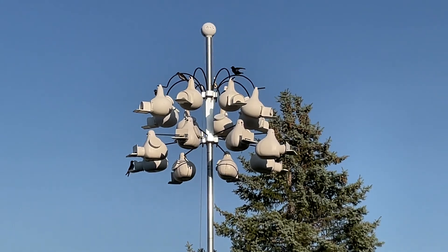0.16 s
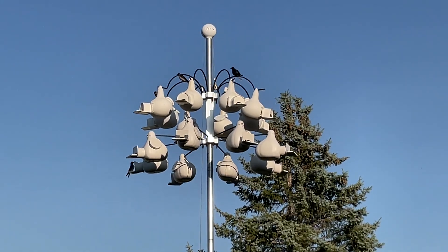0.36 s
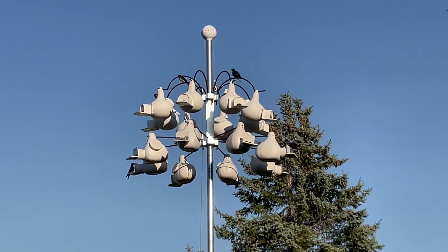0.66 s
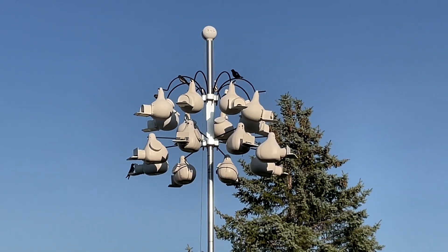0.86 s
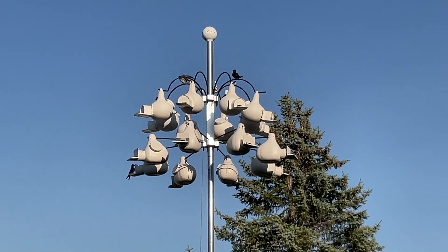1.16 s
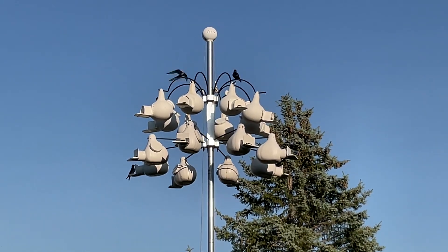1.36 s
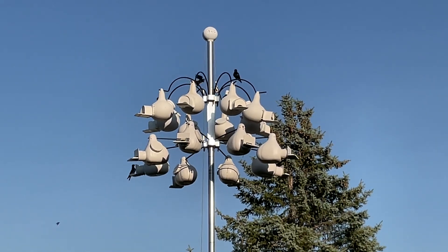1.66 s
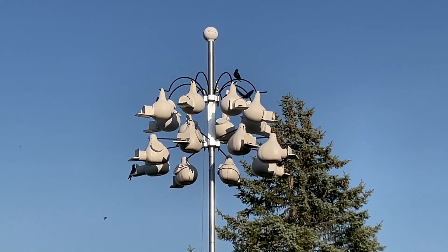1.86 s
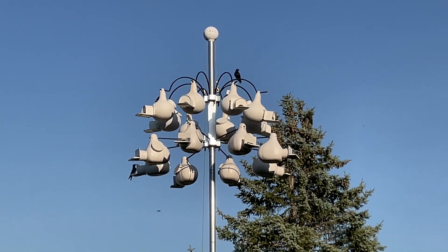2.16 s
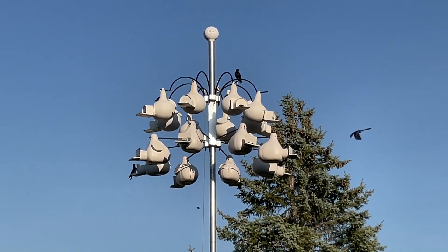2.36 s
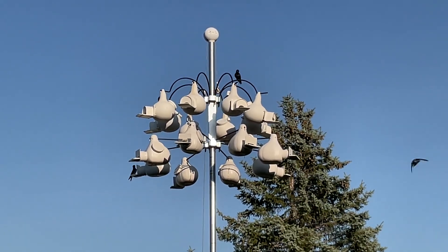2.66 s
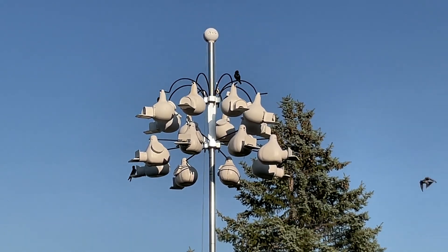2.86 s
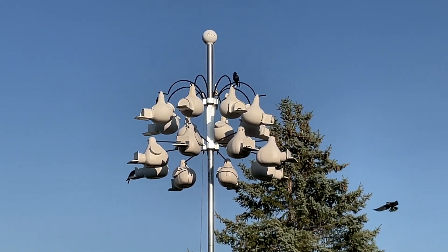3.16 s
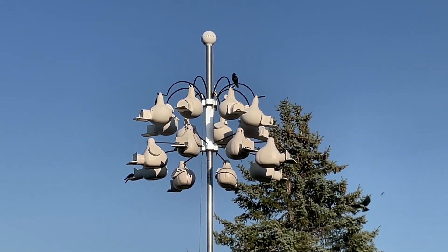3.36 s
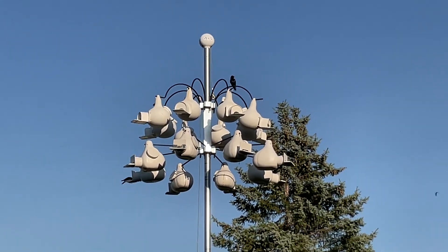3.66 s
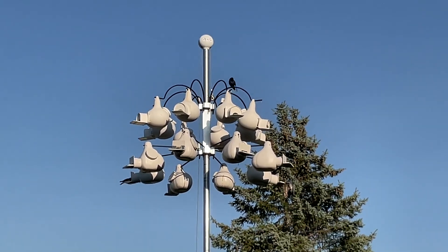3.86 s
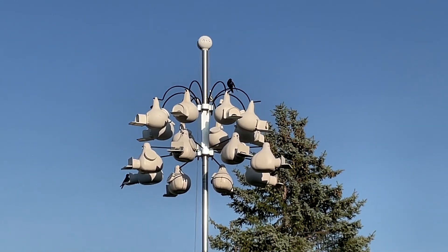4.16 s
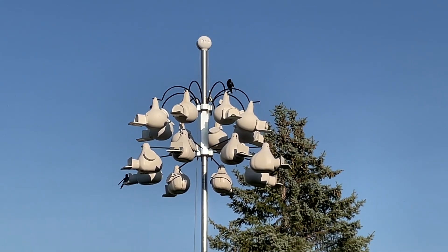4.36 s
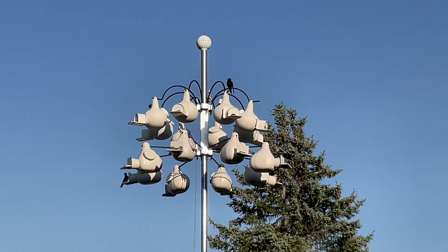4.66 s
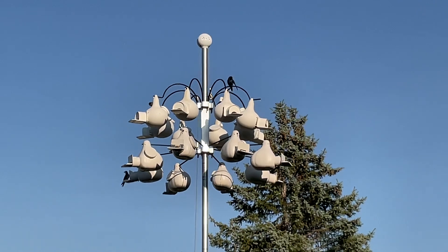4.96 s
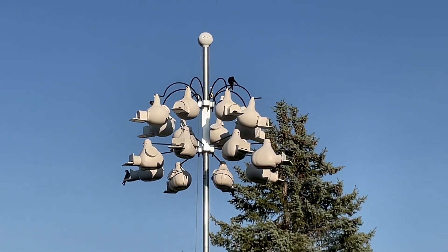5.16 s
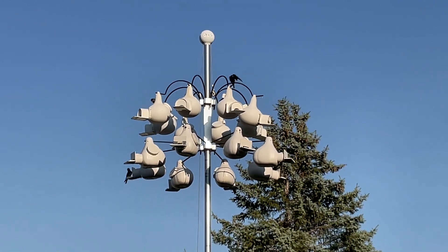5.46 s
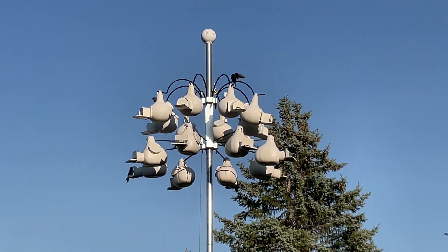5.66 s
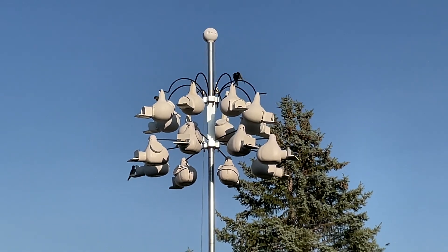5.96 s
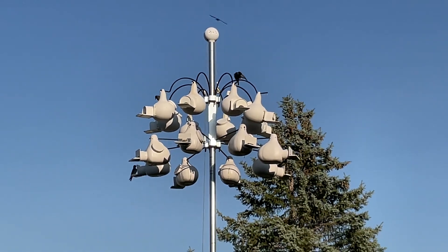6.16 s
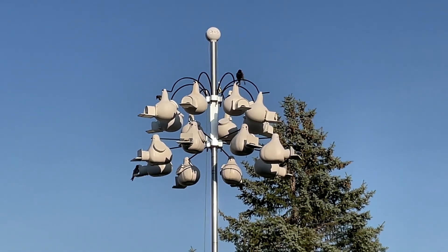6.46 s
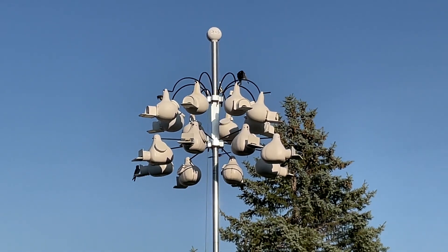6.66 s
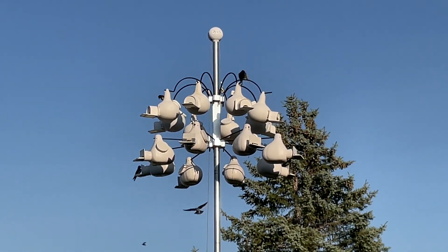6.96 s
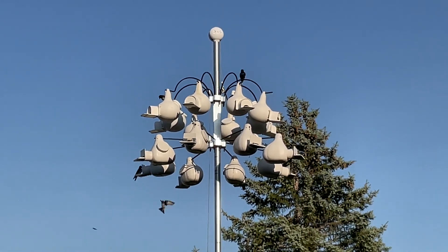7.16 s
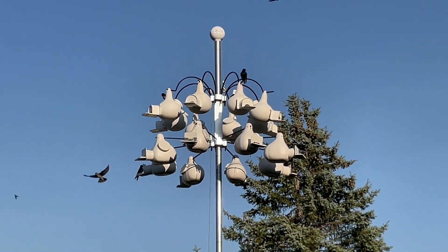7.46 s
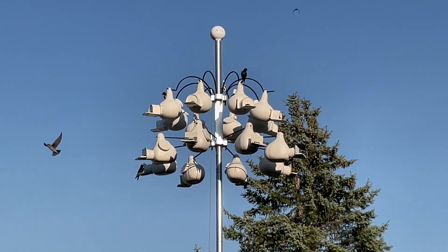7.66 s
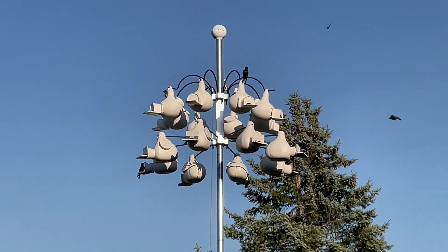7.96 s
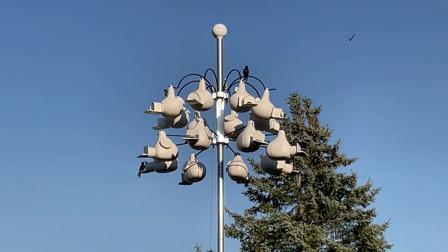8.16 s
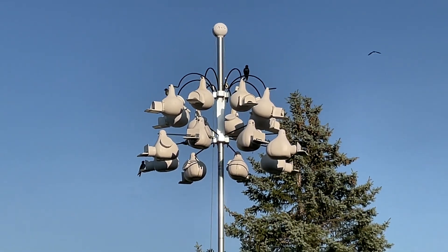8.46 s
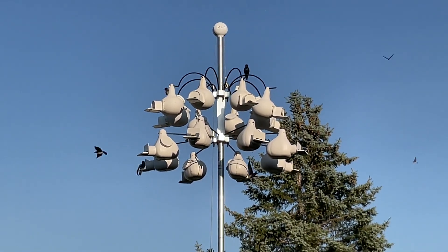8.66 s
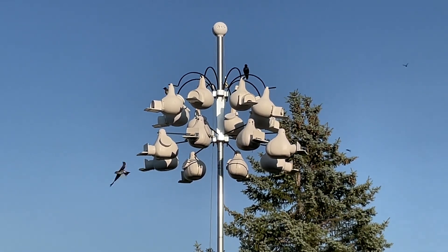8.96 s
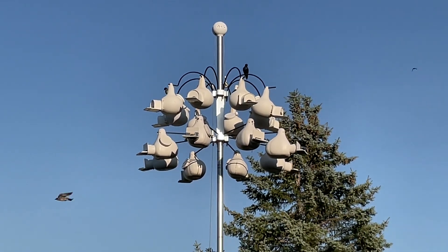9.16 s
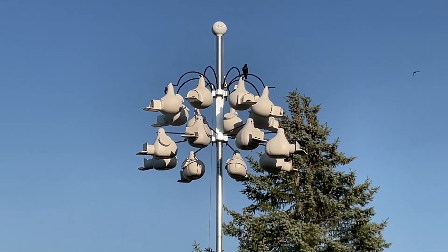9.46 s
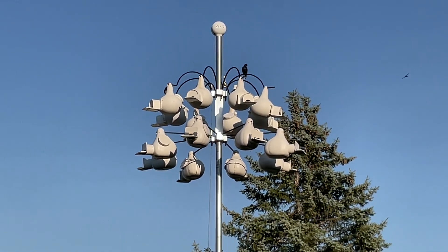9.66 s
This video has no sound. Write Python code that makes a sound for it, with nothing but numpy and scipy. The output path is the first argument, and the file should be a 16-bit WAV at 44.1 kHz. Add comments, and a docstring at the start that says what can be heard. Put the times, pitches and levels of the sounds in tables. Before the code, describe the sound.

Birds call around a rack of nesting gourds in a backyard. Short downward whistles and rough rasps come in scattered bursts, with a quick run of chirps early, a sparser middle, and a busier stretch of chirps and buzzes near the end. Farther birds twitter faintly, and a few light taps sound. Distant traffic and engines rumble low throughout, heard in stereo with a faint outdoor echo.

```python
"""In a back yard, purple martins call around a rack of nesting gourds. Each bird's voice box makes a
nearly pure tone: it slides down for 'chew' calls and wavers fast for buzzes, and two tones make a rasp.
More of the colony chatters farther off, engines drone over distant traffic, and a few light taps sound.
The yard gives a faint echo. Two small microphone openings hear it all, out of step around 3 kHz."""
import sys
import numpy as np
from scipy import signal
from scipy.fft import rfft, irfft, next_fast_len
from scipy.io import wavfile
from scipy.ndimage import map_coordinates

SR = 44100
rng = np.random.default_rng(int(sys.argv[2]) if len(sys.argv) > 2 else 0)


def persist_wave(psi):
    """Save psi, clipped to +-1, as 16-bit WAV."""
    counts = np.round(np.clip(psi, -1, 1) * 32767).astype(np.int16)
    wavfile.write(sys.argv[1], SR, np.atleast_2d(counts).T)


N = 432176

FLICK_S = .014, .028  # shortest and longest note of a distant bird


def amp(db):
    """Turn decibels into a number to multiply by."""
    return 10 ** (np.asarray(db) / 20)


def unit(x):
    """Scale a signal to an average strength (rms) of 1."""
    return x / np.sqrt(np.mean(x ** 2) + 1e-20)


def along(points, hz):
    """Read between (frequency, value) points, with octaves evenly spaced."""
    freqs, values = np.transpose(points)
    return np.interp(np.log(hz + 1), np.log(freqs + 1), values)


def curves(rows):
    """Give one value per sample for each column after the time."""
    times, *columns = np.transpose(rows)
    return [np.interp(np.arange(N) / SR, times, column) for column in columns]


def wobble(rate, size):
    """A smooth curve through rate random points a second."""
    knots = rng.standard_normal(int(size * rate / SR) + 4)
    grid = np.arange(10 * len(knots)) / 10
    smooth = map_coordinates(knots, [grid], mode="nearest")
    return np.interp(np.arange(size) * rate / SR, grid, smooth)


def filtered(x, response):
    """Change the strength and timing of each frequency in x by response(hz)."""
    size = next_fast_len(N + SR // 2)
    return irfft(rfft(x, size) * response(np.fft.rfftfreq(size, 1 / SR)), size)[..., :N]


def add(track, s, sound):
    """Mix a sound into a track at s seconds."""
    part = track[max(round(s * SR), 0):][:len(sound)]
    part += sound[:len(part)]


def spread(pair):
    """Turn two unrelated signals into sound that comes from all around."""
    # how alike left and right are: (frequency [Hz], likeness [0 to 1])
    likeness = [(100, .99), (250, 0.7), (500, 0.58), (1200, 0.25), (2500, 0.92), (4000, 0.88), (9000, 0.9)]
    turn = lambda hz: np.arccos(np.clip(along(likeness, hz), -1, 1)) / 2
    mid, side = filtered(pair, lambda hz: np.array([np.cos(turn(hz)), np.sin(turn(hz))]))
    return np.array([mid + side, mid - side])


def rush(spectrum):
    """Noise from all around, with the given tone colour and a strength of 1."""
    noise = rng.standard_normal((2, N))
    return unit(spread(filtered(noise, lambda hz: amp(along(spectrum, hz)))))


def drone(hz, level_db, overtones, sway_db=2.0):
    """One wavering engine tone; overtones maps multiples of its pitch to dB."""
    phase = 2 * np.pi * np.cumsum(hz + 0.724 * wobble(5, N)) / SR
    tone = np.sin(phase) + sum(amp(db) * np.sin(k * phase) for k, db in overtones.items())
    return np.sqrt(2) * amp(level_db + sway_db * wobble(3.7, N)) * tone


def background(engine_gain_db=-1.06, traffic_db=-52.5, traffic_sway_db=2.4, air_db=-63):
    """Far engines hum over traffic rumble and soft outdoor air."""
    # steady engine tones: (pitch [Hz], relative level [dB])
    hums = [(55.5, -58.5), (61.2, -53.5), (93, -67.5)]
    # three engine tones that swell and drift: (time [s], pitch [Hz], relative level [dB])
    low_tone = [(0, 77.14, -51.5), (3.5, 78.2, -48.5), (5.5, 77.98, -52.5), (7.3, 77.24, -44.5),
                (7.8, 77.76, -51), (8.5, 78.4, -49.5), (9.2, 79.4, -48), (9.8, 83.4, -46)]
    middle_tone = [(0, 101.6, -48), (2.2, 101.7, -51), (3.7, 100.9, -71.5), (5.2, 100.3, -52),
                   (7.3, 101.1, -46), (8.6, 102, -49), (9.8, 102.2, -55)]
    high_tone = [(0, 122.1, -55.5), (2.1, 121.9, -53), (3, 120.3, -63.5), (4, 121.8, -50.5),
                 (5, 124.0, -62.5), (6.4, 124.1, -55), (7.5, 123.5, -54.5), (8.9, 119.8, -48.5),
                 (9.8, 122.3, -56.5)]
    # tone colour of the traffic and the air: (frequency [Hz], relative level [dB])
    traffic_colour = [(25, -30), (40, -11), (55, -2.5), (90, 1.5), (130, -5), (180, -13.5), (250, -20.5),
                      (400, -44), (800, -69.5)]
    air_colour = [(100, -6.5), (300, 1), (550, 1), (800, 2.5), (1200, -2.5), (1800, -6), (2600, -7.5),
                  (3600, -11), (4500, -19), (6000, -26), (8500, -36.5), (13000, -42.5)]
    engines = (sum(drone(hz, db, overtones={3: -18}) for hz, db in hums)
               + drone(*curves(low_tone), overtones={2: -15})
               + drone(*curves(middle_tone), overtones={3: -29})
               + drone(*curves(high_tone), overtones={2: -24}))
    traffic = amp(traffic_db + traffic_sway_db * wobble(6, N)) * rush(traffic_colour)
    air = amp(air_db) * rush(air_colour)
    return amp(engine_gain_db) * engines + traffic + air


def progress(length, edge):
    """How far a note has got at each sample (0 to 1), with extra room for its soft ends."""
    return np.arange(-edge / 2, length + edge / 2, 1 / SR) / length


def swell(u, length, levels_db, attack, release):
    """Loudness along a note (u from 0 to 1): evenly spaced levels between a soft start and end."""
    ends = np.clip(np.minimum(u / attack, (1 - u) / release) * length + .5, 0, 1)
    marks = np.linspace(1 / 6, 5 / 6, len(levels_db))
    return amp(np.interp(u, marks, levels_db)) * np.sin(np.pi / 2 * ends) ** 2


def voice_box(hz, bright_db, step_db, jitter, hoarse, count, flicker_db=6.0):
    """A nearly pure tone with count hoarse overtones, strongest where the bird's throat rings."""
    # how much of an overtone the throat lets out: (frequency [Hz], relative level [dB])
    throat = [(3300, -8), (4100, -13.5), (4900, -22.5), (6000, -24), (7000, -26.5), (8200, -30),
              (9500, -39.5), (11000, -34), (13000, -35)]
    hz = hz * (1 + jitter * wobble(900, len(hz)))
    phase = 2 * np.pi * np.cumsum(hz) / SR
    tone = np.sin(phase)
    for k in range(2, 2 + count):
        treble_share = np.clip(k * hz / 1500 - 2.3, 0, 1)
        db = along(throat, k * hz) + step_db * (k - 2) + bright_db * treble_share
        gain = amp(db + flicker_db * wobble(220, len(hz))) * (k * hz < SR / 2)
        tone = tone + gain * np.sin(k * phase + hoarse * k * wobble(1100, len(hz)))
    return np.sqrt(2) * tone


def chirp(length, start_hz, end_hz, bend, levels_db, bright_db, attack=.012, flutter_db=2):
    """One whistle sliding down; with a positive bend it falls fast and then levels off."""
    u = progress(length, attack)
    fall = np.hypot(u, 0.00289 / length * np.clip(1 - u, 0, 1))  # rounds off the top of the slide
    hz = start_hz * (end_hz / start_hz) ** (fall + bend * fall * (1 - fall))
    hz *= 1 + .01 * wobble(152, len(u))
    flutter = amp(flutter_db * wobble(221.6, len(u)))
    step_db = min(-6.0 + 0.29 * (max(levels_db) + 45.5), -3)  # softer notes lose their high overtones
    voice = voice_box(hz, bright_db, step_db, jitter=0.01, hoarse=.15, count=3)
    return swell(u, length, levels_db, attack, release=.004) * flutter * voice


def twitter(softest_db, low_hz, high_hz, fall, count):
    """The farthest birds scatter faint, ragged, falling notes at random."""
    out = np.zeros(N)
    for k, (when, pitch, size, loud, steep) in enumerate(rng.random((count, 5))):
        hz = low_hz + pitch * (high_hz - low_hz)
        length = np.interp(size, [0, 1], FLICK_S)
        note = chirp(length, hz, hz * fall ** (1 + steep), bend=.17,
                     levels_db=[softest_db + 7 * loud] * 3, bright_db=-3.5)
        roughness = unit(amp(1.2 * wobble(500, len(note))))
        add(out, (k + 2 * when) / count * N / SR, note * roughness)
    return out


def warble(length, peak_hz, scoop, sag, rate, depth, levels_db, bright_db, pulse_db=4.5, attack=0.0195):
    """Pitch wavers rate times a second around an arch; scoop and sag are its ends as shares of the peak."""
    u = progress(length, attack)
    top = .28  # the arch peaks this far into the note
    rising = scoop ** ((1 - u / top) ** 2)
    falling = sag ** (np.abs((u - top) / (1 - top)) ** 1.4)
    arch = peak_hz * np.where(u < top, rising, falling)
    cycle = 2 * np.pi * np.cumsum(rate * (1 + .09 * wobble(98.3, len(u)))) / SR
    swing = np.sin(cycle) + 0.33 * np.sin(2 * cycle)
    hz = arch * (1 + depth * amp(1.5 * wobble(130, len(u))) * swing)
    pulse = unit(amp(-pulse_db * np.cos(cycle) + 1.1 * wobble(250, len(u))))  # louder on each downswing
    voice = voice_box(hz, bright_db, step_db=0.0, jitter=0.017, hoarse=.12, count=2)
    return swell(u, length, levels_db, attack, release=0.013) * pulse * voice


def rasps(lag_s=0.023, warbles_per_s=138):
    """Both sides of the voice box sing: the upper voice leads and fades as the lower one swells."""
    # two-voiced rasps: (time [s], length [s], upper pitch [Hz], lower pitch [Hz],
    # upper level [dB], lower level [dB], brightness [dB])
    calls = [(0.143, 0.085, 4120, 2890, -48, -38, -0.5), (1.066, 0.097, 3370, 2506, -64.5, -50.5, -2.5),
             (1.952, 0.13, 4040, 2730, -60.5, -57, 3.5), (3.093, 0.1, 4186, 2820, -53, -48, 0),
             (4.962, .11, 4140, 2690, -58, -54, 1), (6.429, 0.1, 3980, 2680, -61, -54, -4.5),
             (9.108, 0.084, 3430, 2447, -49.5, -45, -5.5)]
    out = np.zeros(N)
    for s, length, upper_hz, lower_hz, upper_db, lower_db, bright_db in calls:
        upper = warble(length, upper_hz, scoop=.99, sag=.9, rate=warbles_per_s, depth=0.08,
                       levels_db=[upper_db - 2, upper_db, upper_db - 7], bright_db=bright_db + 5.5)
        lower = warble(length - lag_s, lower_hz, scoop=.99, sag=.91, rate=warbles_per_s, depth=0.11,
                       levels_db=[lower_db - 7, lower_db, lower_db - 4], bright_db=bright_db - 6)
        add(out, s - .01, upper)
        add(out, s + lag_s - .01, lower)
    return filtered(out, lambda hz: amp(along([(8400, 3), (10500, -8)], hz)))


def chews(gain_db=-0.7, end_hz=1648):
    """Each 'chew' starts high, usually fades as it falls, and ends on a flatter closing note."""
    # 'chew' calls: (time [s], length [s], start pitch [Hz], bend [no unit], early level [dB],
    # late level [dB], gap before closing note [s], closing level [dB], brightness [dB])
    calls = [(0.147, 0.034, 4300, .15, -41, -43, 0.023, -42, 8.5),
             (0.93, 0.06, 3580, 0.24, -51.5, -50, -0.014, -61, 1.5),
             (2.03, 0.072, 4460, 0.53, -34.5, -50.5, -0.012, -49.5, 1),
             (2.215, 0.054, 4410, 0.12, -41, -53.5, -.002, -53, -3),
             (2.398, 0.048, 4110, -0.19, -36.5, -54, -0.0049, -53, -10),
             (2.641, 0.041, 4450, 0.38, -39, -55.5, 0.0065, -51.5, 0),
             (2.767, 0.047, 4590, 0.03, -36.5, -46, 0.0068, -45, -3.5),
             (4.574, 0.05, 4640, .17, -46, -52.5, 0.0065, -46, -3),
             (4.893, 0.087, 3770, 0.86, -50.5, -61, -0.013, -63, -4),
             (6.962, .064, 4230, 0.68, -54.5, -55, -0.019, -56.5, 2.5),
             (7.199, .09, 4160, 0.88, -51.5, -56.5, .004, -54, -2),
             (7.327, 0.071, 4620, 0.64, -37.5, -52.5, -0.0043, -46.5, 6),
             (7.405, 0.045, 4590, -0.3, -48, -51, 0.0078, -48.5, 0),
             (8.058, 0.072, 4630, .68, -39.5, -52, -0.0058, -47, -3)]
    out = np.zeros(N)
    for s, length, start_hz, bend, early_db, late_db, gap, close_db, bright_db in calls:
        slide = chirp(length, start_hz, end_hz, bend, [early_db, late_db], bright_db)
        close = chirp(.034, 2600, 2180, bend=0.61, levels_db=[close_db + 3, close_db - 3], bright_db=-5)
        add(out, s - .0035, slide)
        add(out, s + length + gap - .0035, close)
    return amp(gain_db) * out


def triplets(slide_s=.05, gap_s=.002):
    """A steep opening note runs into a slide that dips in loudness; a short note closes the call."""
    # three-note calls: (time [s], opening length [s], slide start pitch [Hz], level [dB])
    calls = [(.785, 0.02, 3800, -39.5), (7.746, 0.02, 3610, -40), (8.486, .020, 3914, -40)]
    out = np.zeros(N)
    for s, opening_s, start_hz, db in calls:
        opening = chirp(opening_s, 3470, 2125, bend=-0.67, levels_db=[db, db + 0.5], bright_db=-4.5)
        slide = chirp(slide_s, start_hz, 1827, bend=.08, levels_db=[db, db - 7, db - 5], bright_db=-2)
        close = chirp(0.023, 2840, 2370, bend=0.48, levels_db=[db - 4, db - 5.5], bright_db=-12)
        for delay, note in [(0, opening), (opening_s, slide), (opening_s + slide_s + gap_s, close)]:
            add(out, s + delay - .0035, note)
    return out


def falling_notes(bend=0.28, fade_db=3):
    """Short falling notes sound alone, in quick clusters, or as part of a buzz, rasp or chew."""
    # notes: (time [s], length [s], start pitch [Hz], end pitch [Hz], level [dB], brightness [dB])
    notes = [(0.993, 0.032, 2470, 1540, -56, -27), (1.667, 0.039, 3000, 1850, -54.5, 5.5),
             (1.68, 0.059, 4600, 2120, -59.5, -4), (1.709, 0.045, 2090, 1644, -55, 9),
             (1.742, 0.047, 2070, 1690, -57.5, 1), (3.799, .031, 3160, 1880, -61, 10.5),
             (4.081, 0.04, 3330, 1750, -50, 1.5), (4.102, 0.042, 3670, 1690, -54.5, 8),
             (7.161, 0.015, 2730, 2040, -53.5, 2), (7.174, .042, 3160, 1960, -49, -9),
             (7.516, 0.05, 3000, 2125, -60.5, 11), (8.376, 0.014, 3030, 1930, -46, 0),
             (8.407, .03, 2870, 1978, -50.5, -4), (8.442, 0.02, 3120, 2620, -34.5, -25),
             (9.114, 0.0094, 4030, 3780, -39, -8)]
    out = np.zeros(N)
    for s, length, start_hz, end_hz, db, bright_db in notes:
        add(out, s - .0035, chirp(length, start_hz, end_hz, bend, [db, db - fade_db], bright_db))
    return out


def knocks():
    """Light taps, each a short ring and a crack of noise."""
    # taps: (time [s], level [dB], ring pitch [Hz], time to fade 60 dB [s], crack against ring [dB])
    taps = [(1.127, -47, 263, 0.035, -24), (2.145, -42, 740, .04, -32), (2.971, -39, 660, 0.033, -39),
            (8.769, -61, 5470, 0.011, 11.5), (8.873, -57.5, 6660, 0.014, -1)]
    out, t = np.zeros(N), np.arange(SR // 8) / SR
    for s, db, hz, fade_s, crack_db in taps:
        ring = np.sin(2 * np.pi * hz * t) * amp(-60 * t / fade_s) * (1 - np.exp(-t / 0.00089))
        crack = amp(crack_db - 60 * t / 0.0094) * rng.standard_normal(len(t))
        add(out, s, amp(db) * (ring + crack))
    return filtered(out, lambda hz: 1 / (1 + (hz / 9500) ** 4))


def far_chips(fall=.8, rough_db=3):
    """Birds farther off give short, ragged, falling chips."""
    # distant chips: (time [s], middle pitch [Hz], level [dB])
    chips = [(1.32, 3580, -63), (1.53, 5840, -72), (2.509, 6030, -71), (3.22, 3460, -62),
             (3.39, 3810, -60.5), (5.54, 5730, -72), (5.79, 3800, -65.5), (6.54, 3787, -61.5),
             (6.74, 5220, -70), (6.83, 3800, -63), (7.93, 3700, -56.5), (8.83, 6000, -68.5),
             (9.42, 3580, -61)]
    out = np.zeros(N)
    for (s, hz, db), size in zip(chips, rng.random(len(chips))):
        length = np.interp(size, [0, 1], FLICK_S)
        note = chirp(length, hz / np.sqrt(fall), hz * np.sqrt(fall), 0, [db] * 3, bright_db=1.5)
        roughness = unit(amp(rough_db * wobble(500, len(note))))
        add(out, s - .014, note * roughness)
    return out


def buzzes(rise_db=5, edge_db=5, scoop=0.89):
    """A single warbling voice swells and dies away, with a bright edge near 10 kHz."""
    # buzzes: (time [s], length [s], peak pitch [Hz], end pitch [Hz], warbles [per s],
    # warble depth [share of pitch], level [dB], fade [dB], brightness [dB])
    calls = [(6.9, 0.083, 2580, 2190, 120, 0.056, -54.5, 5, -23),
             (7.618, .129, 3423, 2266, 157, 0.094, -38.5, 8, -4),
             (8.365, .11, 3343, 2580, 135, 0.074, -39, 14.5, 0),
             (8.591, .143, 3483, 2900, 160, 0.058, -43, 11.5, -3.5),
             (9.647, 0.13, 3080, 2420, 133, 0.084, -49.5, 1, -17)]
    out = np.zeros(N)
    for s, length, peak_hz, end_hz, rate, depth, db, fade_db, bright_db in calls:
        levels_db = [db - rise_db, db, db - fade_db]
        note = warble(length, peak_hz, scoop, end_hz / peak_hz, rate, depth, levels_db, bright_db)
        add(out, s - .01, note)
    return filtered(out, lambda hz: amp(along([(8000, -1), (9700, edge_db)], hz)))


def ground_bounce(x, delay_s, db):
    """A bounce off the ground boosts some pitches and weakens others, so slides sound uneven."""
    return filtered(x, lambda hz: 1 + amp(db) * np.exp(-2j * np.pi * hz * delay_s))


def yard_echo(x, quick_db, long_db, quick_fade_s):
    """Gourds, ground and walls scatter a quick echo; trees and houses return a long faint one."""
    # how the long echo dies away: (frequency [Hz], time to fade 60 dB [s])
    fade_times = [(300, 0.54), (2400, 0.91), (4000, 0.84), (5500, .35), (7000, .24), (12000, 0.2)]
    hz, t, bands = signal.stft(rng.standard_normal((2, SR)), SR, nperseg=256)
    tail = signal.istft(bands * amp(-60 * t / along(fade_times, hz)[:, None]), SR, nperseg=256)[1]
    t = np.arange(tail.shape[1]) / SR
    scatter = rng.standard_normal(tail.shape) * amp(-60 * t / quick_fade_s)
    echo = amp(long_db) * tail / np.linalg.norm(tail[0])
    echo += amp(quick_db) * scatter / np.linalg.norm(scatter[0])
    delayed = np.pad(x, (SR // 200, 0))
    return spread(signal.fftconvolve(delayed[None], echo, axes=1)[:, :N])


def scene(warble_top_hz=11000, far_direct_db=-2):
    """Near birds have little echo; distant ones lie deep in it."""
    # how the open beak colours a whistle: (frequency [Hz], boost [dB])
    beak = [(1550, -8), (1900, -4), (2350, 2.5), (2800, 1.5), (3550, 0), (4400, -2.5), (5500, -0.5),
            (7300, -2.5), (8600, -0.5), (10000, -2), (11600, -1), (13000, -5)]
    taps = knocks()
    warbles = filtered(rasps() + buzzes(), lambda hz: 1 / (1 + (hz / warble_top_hz) ** 20))
    whistles = filtered(chews() + triplets() + falling_notes(), lambda hz: amp(along(beak, hz)))
    near = ground_bounce(whistles + warbles, delay_s=.0034, db=-13.5) + taps
    far = (far_chips()
           + twitter(softest_db=-71.5, low_hz=3630, high_hz=4510, fall=.86, count=90)
           + twitter(softest_db=-83, low_hz=5270, high_hz=7400, fall=0.79, count=55))
    # overtones beam away from the microphone, so more of them arrives as echo
    thrown = filtered(near, lambda hz: amp(along([(2200, 0.5), (3000, 0.5), (4300, -2), (5500, 12.5)], hz)))
    near_echo = yard_echo(thrown, quick_db=-18.5, long_db=-17, quick_fade_s=0.13)
    far_echo = yard_echo(far, quick_db=-6, long_db=-15, quick_fade_s=0.21)
    return near + near_echo + amp(far_direct_db) * far + far_echo + background()


def record(dry):
    """The two microphone openings differ in timing and level; nothing above 13.1 kHz gets through."""
    # how far the left wave runs ahead of the right: (frequency [Hz], lead [radians])
    left_lead = [(300, 0), (800, 2.6), (1100, 5.8), (1550, 6.2), (1900, 5.1), (2150, 4.2), (2900, 3.1),
                 (3500, 1.5), (3900, .6), (4800, .3), (5300, .9), (6000, .2), (7000, .9), (9000, 0)]
    # how much louder the left is than the right: (frequency [Hz], level [dB])
    left_boost = [(350, -0.5), (750, 5.5), (1000, 7.5), (1400, 3.5), (2200, 0.1), (4000, 0)]

    def openings(hz):
        """Left and right each take half of the difference."""
        left = amp(along(left_boost, hz) / 2) * np.exp(.5j * along(left_lead, hz))
        return np.array([left, 1 / left]) * (hz < 13100)
    return filtered(dry, openings)


dry = scene()
out = record(dry)
persist_wave(out)
```